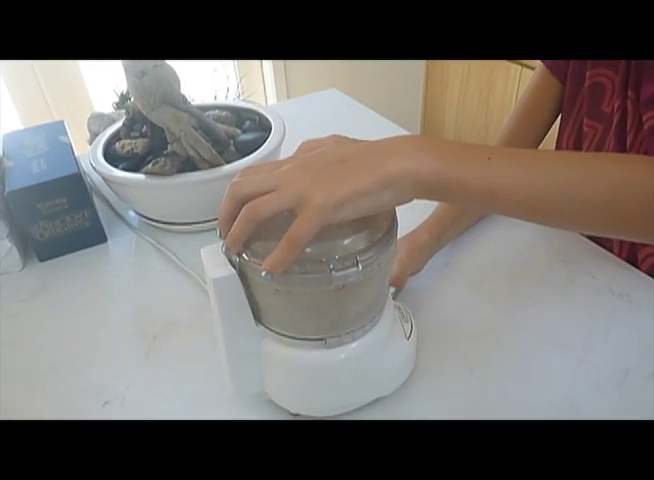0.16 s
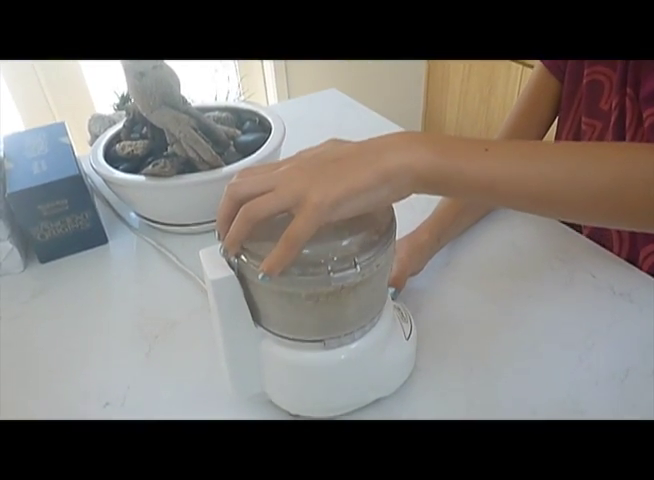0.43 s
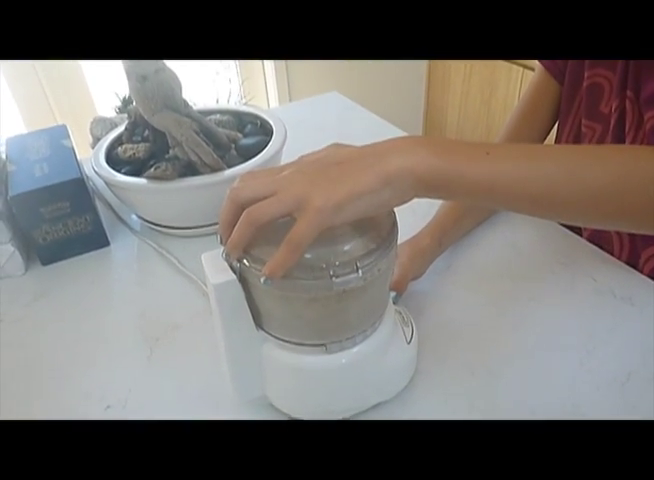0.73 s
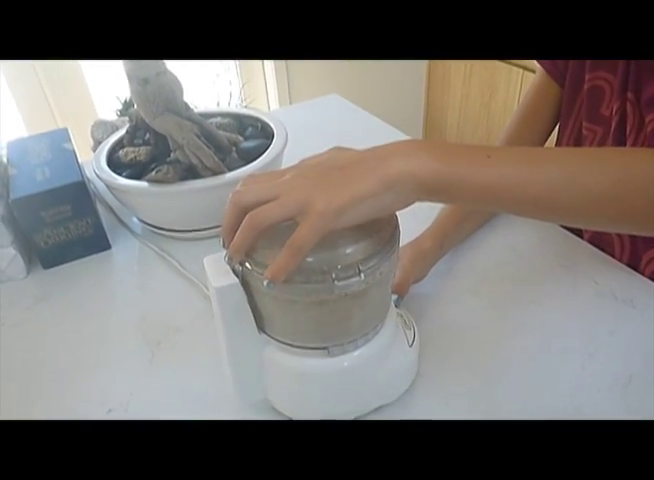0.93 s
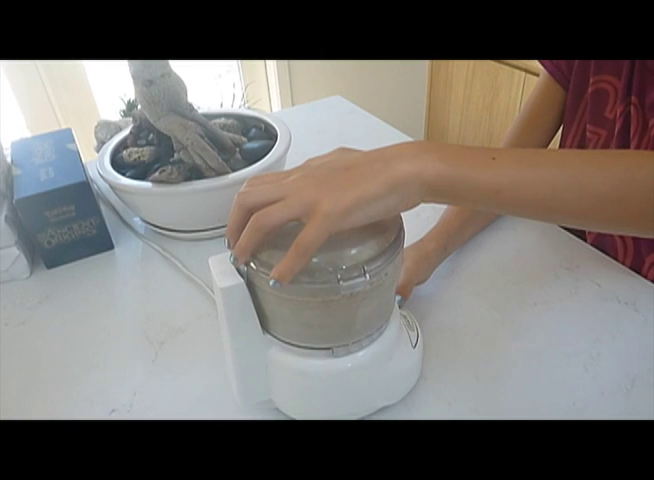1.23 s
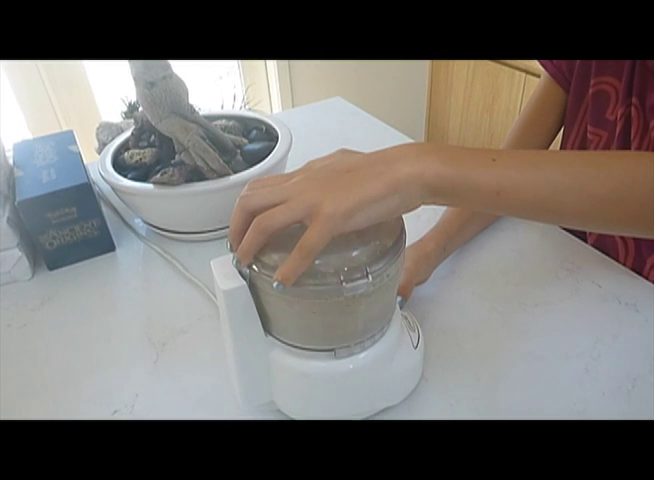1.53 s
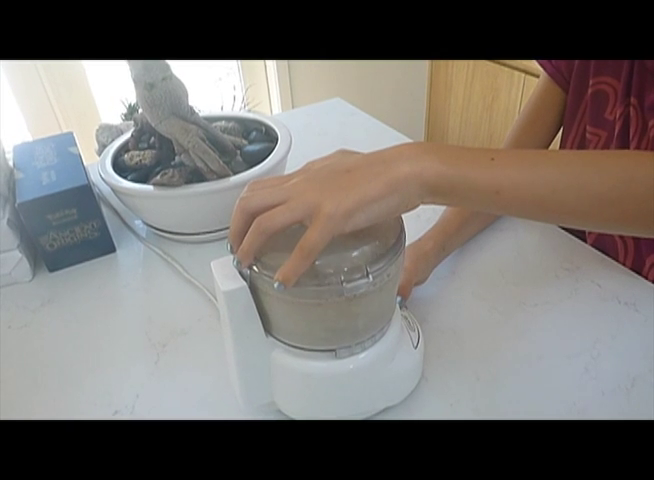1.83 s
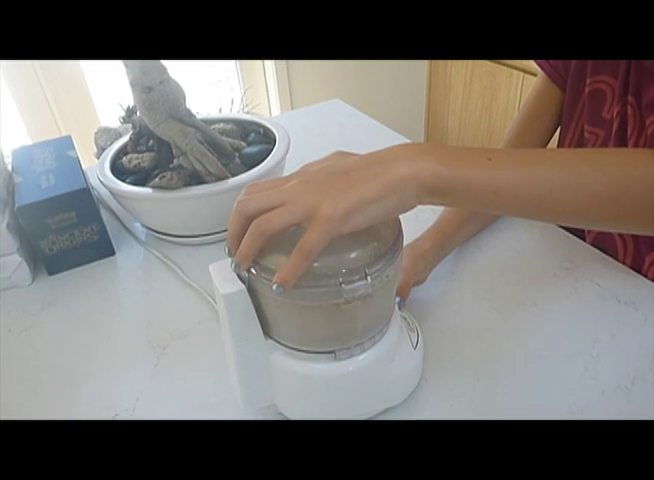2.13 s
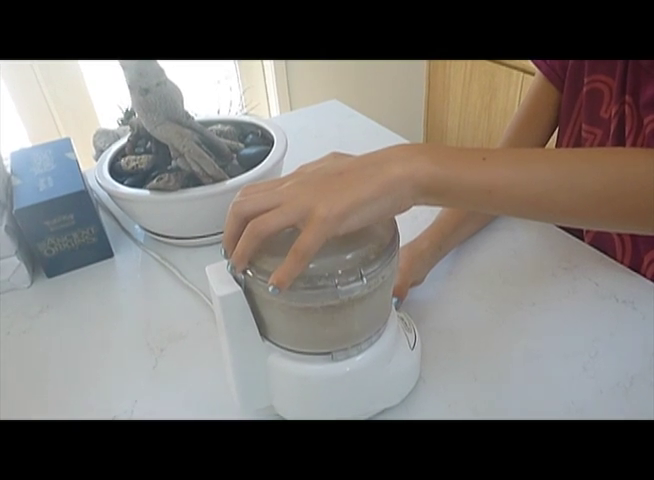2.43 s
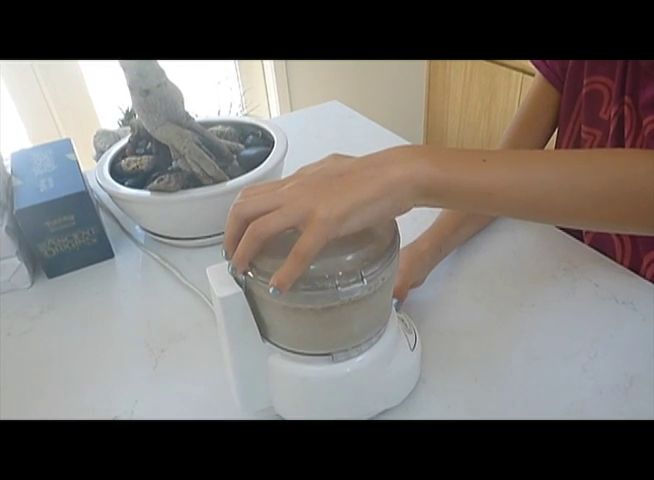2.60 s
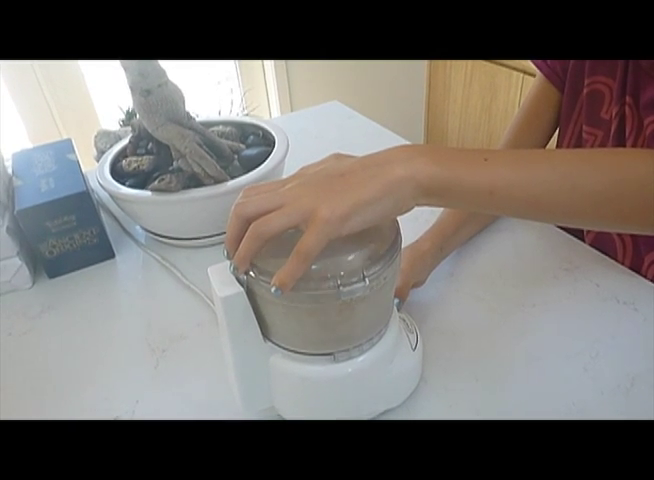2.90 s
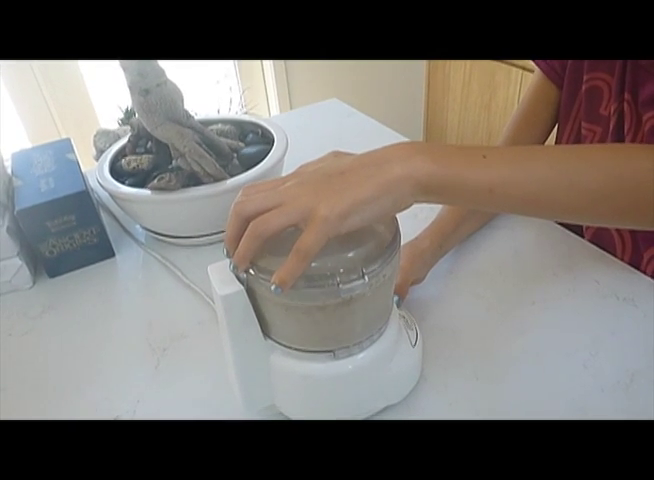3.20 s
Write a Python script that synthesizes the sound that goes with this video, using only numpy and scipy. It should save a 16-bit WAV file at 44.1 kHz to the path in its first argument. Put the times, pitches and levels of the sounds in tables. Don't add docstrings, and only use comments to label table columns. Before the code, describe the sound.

Continuous close-up grinding of nuts in a plastic food processor bowl, crackling busily at first, then sparser and finer, with occasional soft knocks and a low unsteady hum beneath; nearly central sound in a fairly dry kitchen.

```python
import sys
import numpy as np
from scipy import signal
from scipy.fft import rfft, irfft
from scipy.io import wavfile
from scipy.ndimage import uniform_filter1d

SR = 44100
rng = np.random.default_rng(int(sys.argv[2]) if len(sys.argv) > 2 else 0)


def makeup_ratio(level_db):
    decades = np.asarray(level_db, float) / 20
    return 10 ** decades


def generate_wav(signal):
    frames = np.transpose(np.atleast_2d(signal))
    scaled = np.clip(frames, -1, 1) * 32767
    pcm = np.round(scaled).astype(np.int16)
    wavfile.write(sys.argv[1], SR, pcm)


N = 147735

# start in seconds, level in dB (rms), ring in Hz,
# length in ms, treble share in dB.
CRACKS = [(0.0422, -24.2, 2930, 4.2, -11.0), (0.061, -24.3, 3010, 2.5, -11.0),
          (0.0827, -26.7, 2820, 3.0, -13.0), (0.0956, -22.7, 3320, 3.6, -13.0),
          (0.107, -28.1, 3830, 2.4, -9.0), (0.1379, -28.7, 5300, 2.2, -9.0),
          (0.1442, -24.7, 5580, 2.6, -9.0), (0.2069, -27.4, 3210, 2.8, -9.0),
          (0.3493, -23.9, 3850, 2.6, -13.0), (0.3676, -26.6, 2240, 3.1, -13.0),
          (0.4874, -26.3, 3210, 2.9, -10.0), (0.5017, -27.6, 3730, 2.1, -8.0),
          (0.5569, -23.9, 3190, 2.5, -7.0), (0.5956, -19.2, 5380, 3.7, -7.0),
          (0.7041, -26.8, 5990, 2.8, -13.0), (0.7371, -27.8, 3290, 2.7, -8.0),
          (0.82, -26.0, 3980, 3.2, -11.0), (0.9292, -24.9, 5380, 2.7, -10.0),
          (1.011, -23.8, 5470, 2.6, -6.0), (1.1457, -28.9, 5600, 2.6, -7.0),
          (1.1519, -27.7, 4160, 3.1, -12.0), (1.1841, -28.1, 2890, 3.2, -11.0),
          (1.341, -27.1, 3320, 3.0, -7.0), (1.3561, -24.9, 3290, 2.5, -11.0),
          (1.397, -25.5, 5360, 2.8, -12.0), (1.4937, -27.6, 5230, 2.6, -10.0),
          (1.5575, -26.0, 5710, 2.6, -8.0), (1.5884, -26.0, 3340, 2.9, -5.0),
          (1.6209, -26.1, 3420, 3.6, -15.0), (1.6929, -28.4, 5900, 2.5, -10.0),
          (1.7596, -29.1, 3060, 3.5, -5.0), (1.8249, -28.2, 3360, 4.3, -11.0),
          (1.97, -22.5, 3470, 2.8, -10.0), (2.3531, -28.1, 3850, 2.6, -7.0),
          (2.6721, -27.8, 2170, 3.3, -11.0), (2.7316, -26.0, 3040, 4.6, -11.0),
          (2.7737, -22.7, 3490, 3.1, -15.0), (2.9524, -23.0, 3490, 2.7, -13.0),
          (2.9872, -28.7, 5380, 4.2, -6.0), (3.3232, -27.6, 5490, 2.7, -8.0)]
# start in seconds, level in dB (rms), ring in Hz.
CHIPS = [(0.0036, -27.8, 3210), (0.0169, -28.1, 3270), (0.0351, -27.9, 3080), (0.1856, -28.9, 5400),
         (0.2135, -29.1, 5360), (0.2347, -29.8, 5490), (0.2468, -31.4, 3640), (0.3376, -29.4, 5470),
         (0.4538, -29.4, 3510), (0.5232, -30.8, 2860), (0.5428, -28.3, 3400), (0.5725, -29.7, 4740),
         (0.615, -29.0, 3250), (0.6732, -30.9, 3450), (0.6832, -28.4, 3470), (0.7211, -29.0, 3290),
         (0.8001, -30.7, 5640), (0.8338, -31.1, 3730), (0.843, -30.7, 5450), (0.8493, -29.8, 3140),
         (0.8762, -29.5, 4180), (0.897, -30.9, 3230), (0.945, -30.3, 5450), (1.0575, -31.6, 3640),
         (1.0997, -30.9, 3400), (1.1763, -31.1, 2240), (1.2105, -31.1, 3190), (1.2193, -30.3, 3100),
         (1.2466, -31.3, 2990), (1.2596, -30.2, 3470), (1.3111, -30.7, 5490), (1.3806, -28.7, 4200),
         (1.4224, -31.2, 5880), (1.445, -30.1, 3980), (1.4547, -30.9, 3450), (1.4714, -30.5, 2200),
         (1.531, -31.0, 5660), (1.6817, -30.8, 4330), (1.8422, -29.7, 4310), (1.8898, -31.6, 3080),
         (1.942, -28.7, 3360), (2.0105, -31.3, 5380), (2.03, -31.3, 2990), (2.0648, -30.3, 3340),
         (2.0954, -32.0, 3360), (2.1235, -31.4, 5920), (2.1292, -31.4, 3470), (2.2462, -31.6, 3290),
         (2.2859, -30.1, 4290), (2.5798, -29.0, 4160), (2.7658, -30.0, 3400), (2.8076, -29.8, 3750),
         (2.8156, -30.2, 3790), (2.8399, -29.5, 4010), (2.9136, -29.0, 4160), (2.9347, -30.7, 2950),
         (2.9794, -30.1, 3360), (3.12, -31.1, 3140), (3.1799, -30.6, 3550), (3.308, -29.6, 3790)]
# start in seconds, level in dB (rms), ring in Hz.
FAINT_CHIPS = [(0.3184, -32.2, 5380), (0.4076, -32.3, 5430), (0.5144, -32.0, 5530), (0.5323, -31.9, 5230),
               (0.5864, -31.6, 4310), (0.6567, -31.6, 2200), (0.8277, -31.2, 5250), (0.9078, -32.3, 5340),
               (1.5222, -31.2, 5940), (1.538, -31.9, 3080), (1.5728, -32.0, 2170), (1.8565, -31.9, 5300),
               (1.9763, -31.5, 3400), (2.2314, -32.1, 2860), (2.5233, -31.8, 2220), (2.5427, -31.7, 4440),
               (2.6913, -31.4, 3120), (2.702, -31.5, 3120), (2.7422, -31.4, 3170), (2.7598, -31.2, 3380),
               (2.8004, -30.9, 5340), (2.8577, -31.8, 3380), (2.9002, -31.4, 2950), (3.0852, -31.6, 5430)]


def rms_one(x):
    return x / np.sqrt(np.mean(x ** 2) + 1e-20)


def in_time(rows):
    s, *columns = np.transpose(rows)
    return [np.interp(np.arange(N) / SR, s, c) for c in columns]


def drift(rate_hz):
    r = np.exp(-2 * np.pi * rate_hz / SR)
    slow = signal.lfilter([1], [1, -2 * r, r * r], rng.standard_normal(N + SR))
    return rms_one(slow[SR:])


def butter(x, order, hz, kind):
    return signal.sosfilt(signal.butter(order, hz, kind, fs=SR, output="sos"), x)


def resonance(x, hz, width_hz):
    r = np.exp(-np.pi * width_hz / SR)
    poles = [1, -2 * r * np.cos(2 * np.pi * hz / SR), r * r]
    return signal.lfilter([(1 - r * r) / 2, 0, (r * r - 1) / 2], poles, x)


def octave(x, hz):
    return butter(x, 1, [hz / np.sqrt(2), min(hz * np.sqrt(2), .48 * SR)], "band")


def bowl(x):
    # frequency in Hz, width in Hz, gain in dB.
    modes = [(172, 122, 12.5), (486, 490, -6.5), (791, 340, 12.5), (1533, 150, 3.5), (1934, 73, -16),
             (2235, 357, 8.5), (2394, 49, -25), (3153, 1590, 14), (4200, 890, 4), (5615, 1260, 9.5),
             (8120, 1600, 3.5), (9170, 1900, -0.5), (11600, 610, -2), (14680, 3000, 7.5)]
    sos = [signal.butter(2, 114, "high", fs=SR, output="sos")[0]]
    for hz, width_hz, db in modes:
        a, g, c = np.tan(np.pi * width_hz / SR), makeup_ratio(db / 2), -2 * np.cos(2 * np.pi * hz / SR)
        peak = np.array([1 + a * g, c, 1 - a * g, 1 + a / g, c, 1 - a / g])
        sos.append(peak / (1 + a / g))
    impulse = np.eye(1, SR)[0]
    energy = np.sum(signal.sosfilt(sos, impulse) ** 2)
    return signal.sosfilt(sos, x) / np.sqrt(energy)


def kitchen(x):
    t60_s, wall_cut_hz = 0.22, 2140
    out, dull = np.zeros(N), np.exp(-2 * np.pi * wall_cut_hz / SR)
    lags = (rng.uniform(0.0073, .03, 10) * SR).astype(int)
    for k, lag in enumerate(lags):
        loop, gain, state = x.copy(), makeup_ratio(-60 * lag / SR / t60_s), [0.]
        for i in range(lag, N, lag):
            back, state = signal.lfilter([gain * (1 - dull)], [1, -dull], loop[i - lag:i], zi=state)
            loop[i:i + lag] += back[:N - i]
        out += (loop - x) * (-1) ** k
    return out


def motor():
    # time in seconds, level in dB.
    unbalance = [
        (0.0, -52),
        (0.16, -51),
        (0.33, -67),
        (0.53, -52),
        (0.95, -50),
        (1.12, -64),
        (3.35, -66),
    ]
    # time in seconds, frequency in Hz, level in dB.
    housing = [
        (0.0, 272.8, -47),
        (0.89, 287, -46),
        (1.06, 296.8, -48.5),
        (1.15, 282, -47.5),
        (1.81, 288.5, -48),
        (2.17, 288, -45.5),
        (2.29, 271.7, -56.5),
        (2.41, 287.5, -48.5),
        (3.35, 289.1, -43.5),
    ]
    shaft_hz, shaft_wobble_hz, shaft_db = 145.8, 3.04, 1.5
    hum_wobble_hz, throb_db, rough_db, rough_width_hz = 5, 3.8, -3.5, 55
    judder_db, rumble_db, rumble_hz = -59.5, -73.5, 73.5

    unbalance_db, = in_time(unbalance)
    hum_hz, hum_db = in_time(housing)
    shaft_phase = 2 * np.pi * np.cumsum(shaft_hz + shaft_wobble_hz * drift(7.8)) / SR
    shaft = makeup_ratio(unbalance_db + shaft_db) * np.sin(shaft_phase)

    throb = makeup_ratio(throb_db * drift(18))
    line = throb * np.sin(2 * np.pi * np.cumsum(hum_hz + hum_wobble_hz * drift(12.55)) / SR)
    skirt = rng.standard_normal(N)
    for _ in range(2):
        skirt = resonance(skirt, hum_hz.mean(), rough_width_hz)
    hum = makeup_ratio(hum_db) * rms_one(rms_one(line) + makeup_ratio(rough_db) * rms_one(skirt))

    rumble = butter(rng.standard_normal(N), 2, [rumble_hz / 2, rumble_hz * 2], "band")
    judder = resonance(rng.standard_normal(N), shaft_hz, rough_width_hz / 2)
    return np.sqrt(2) * shaft + makeup_ratio(judder_db) * rms_one(judder) + hum + makeup_ratio(rumble_db) * rms_one(rumble)


def knocks():
    # start in seconds, level in dB (rms).
    throws = [(0.027, -39.3), (0.061, -42.8), (0.446, -44.1), (0.488, -43.2), (0.524, -41.5),
              (0.587, -42.9), (0.698, -42.6), (0.721, -41.6), (0.875, -41.1), (1.154, -41.6),
              (1.263, -43.8), (1.338, -41.4), (1.36, -43.8), (1.467, -43.0), (1.491, -42.3), (1.716, -40.8),
              (1.772, -41.4), (1.969, -38.5), (2.578, -42.2), (2.668, -40.1), (2.734, -42.2),
              (2.771, -43.7), (3.292, -42.7)]
    length_ms, cut_hz = 6, 1500
    out, ms_since = np.zeros(N + SR), 1000 * np.arange(SR // 20) / SR
    envelope = ms_since * np.exp(-2 * ms_since / length_ms)
    bursts = rng.choice([-1., 1.], (len(throws), len(ms_since))) * envelope
    bursts = butter(bowl(bursts), 2, [cut_hz / 3, cut_hz], "band")
    for (s, db), burst in zip(throws, bursts):
        i = int(s * SR)
        loudest = np.sqrt(uniform_filter1d(burst ** 2, size=500).max())
        out[i:i + len(burst)] += makeup_ratio(db) * burst / loudest
    return out[:N]


def crumbs():
    # time in seconds, level in dB.
    whirl = [(0, -28), (.1, -32.5), (.14, -35), (.21, -31.5), (.3, -35), (.5, -32), (.74, -33),
             (.98, -33.5), (1.2, -33.5), (1.4, -33), (1.7, -34.5), (1.93, -32.5), (2.06, -34), (2.4, -33.5),
             (2.75, -32), (2.97, -31.5), (3.04, -34), (3.35, -32)]
    # frequency in Hz, width in Hz, level in dB.
    wall_rings = [(681, 47, 9), (818, 45, 7), (1003, 41, 11), (1550, 280, -1), (2230, 470, 6.5),
                  (2910, 73, 5.5), (3630, 117, -14), (4230, 530, 2.5), (5250, 180, 6.5), (6000, 290, 4.5),
                  (7850, 1900, -3), (15200, 1350, 2.5)]
    powder_db, flicker_db, patch_db = -1.5, 1.5, 0.5
    ticks_per_s, spread_db, tick_ms, tick_db, clump_db = 900, 3, 0.99, -4, .8
    ringing_db = 6.5 + 15.5
    follow = 0.4
    finer_db_per_s = -1.5
    lull_db, lull_ms = -8, 5

    t = np.arange(N) / SR
    level_db, = in_time(whirl)
    together, powder, white = drift(23), 0, rng.standard_normal(N)

    born = rng.random(N) < ticks_per_s * makeup_ratio(clump_db * drift(18)) / SR
    sizes = born * makeup_ratio(spread_db * np.minimum(rng.exponential(1, N), 1.6))
    dealt = rng.integers(0, len(wall_rings), N)
    fall = np.exp(-1000 / (tick_ms * SR))
    swell = [1, -2 * fall, fall ** 2]
    broad = white * signal.lfilter([1], swell, sizes)
    ringing = 0
    for k, (hz, width_hz, db) in enumerate(wall_rings):
        strikes = white * signal.lfilter([1], swell, sizes * (dealt == k))
        ringing = ringing + makeup_ratio(db) * resonance(strikes, hz, width_hz)
    ticks = rms_one(broad + makeup_ratio(ringing_db) * ringing)

    for hz in 72 * 2. ** np.arange(9):
        flicker = makeup_ratio(flicker_db * together + patch_db * drift(28))
        powder = powder + octave(rng.standard_normal(N), hz) * flicker

    lull = 0
    for s, *_ in list(CRACKS) + list(CHIPS) + list(FAINT_CHIPS):
        lull = lull + np.exp(-((s - t) * 1000 / lull_ms - .5) ** 2)
    coarse_db = tick_db + follow * (level_db - level_db.mean()) + finer_db_per_s * t + lull_db * lull
    return bowl(makeup_ratio(level_db) * (makeup_ratio(powder_db) * rms_one(powder) + makeup_ratio(coarse_db) * ticks))


def cracks():
    crack_db, ring_db, ring_width_hz, snap_db, snap_ms = .6, -2, 600, -4, .5
    small_ms, rise_ms, fall_ms, small_treble_db, treble_hz = 2.8, .3, 1.6, -9, 7500
    small = [(*row, small_ms, small_treble_db) for row in list(CHIPS) + list(FAINT_CHIPS)]
    pieces = np.array(list(CRACKS) + small)
    out, ms_since = np.zeros(N + SR), 1000 * np.arange(SR // 40) / SR

    white = rng.choice([-1., 1.], (len(pieces), len(ms_since))) * np.minimum(ms_since / rise_ms, 1)
    snap = makeup_ratio(snap_db) * np.exp(-ms_since / snap_ms)
    splinter = np.exp(-np.maximum(ms_since - pieces[:, 3:4] + rise_ms, 0) / fall_ms)
    bursts = bowl(white * (snap + splinter))
    low, high = butter(bursts, 4, treble_hz, "low"), butter(bursts, 4, treble_hz, "high")

    for (s, db, hz, _, treble_db), body, treble in zip(pieces, low, high):
        body = rms_one(body) + makeup_ratio(ring_db) * rms_one(resonance(body, hz, ring_width_hz))
        treble = treble * np.exp(-ms_since / small_ms)
        burst = rms_one(body) + makeup_ratio(treble_db) * rms_one(treble)
        i = int(s * SR)
        loudest = np.sqrt(uniform_filter1d(burst ** 2, size=110).max())
        out[i:i + len(burst)] += makeup_ratio(db + crack_db) * burst / loudest
    return out[:N]


def scene():
    grind = crumbs() + cracks() + knocks()
    mono = grind + makeup_ratio(-17.5) * kitchen(grind) + motor()
    return np.tile(mono, (2, 1))


def band_limit(x):
    return signal.sosfilt(signal.butter(12, 16910, fs=SR, output="sos"), x)


def record(dry):
    # centre in seconds, half length in seconds, side below mid in dB.
    partings = [(0.116, 0.024, -10.5), (.477, 0.027, -13), (1.343, 0.041, -10.5), (1.502, 0.024, -12),
                (1.735, 0.021, -12), (1.89, 0.038, -12.5), (1.992, 0.017, -16), (2.353, 0.026, -12),
                (2.438, 0.02, -11), (2.91, 0.032, -13.5), (2.951, 0.023, -10), (3.148, 0.036, -15),
                (3.35, 0.021, -15)]
    bands, parted_share = 90, .65
    t, colour, side = np.arange(N) / SR, np.abs(rfft(dry[0])), 0
    band = (bands * np.sqrt(np.linspace(0, 1, len(colour)))).astype(int)
    scrambled = colour * np.exp(2j * np.pi * rng.random(len(colour)))
    parted = rng.random((len(partings), bands + 1)) < parted_share
    for (s, half, db), open_bands in zip(partings, parted):
        window = np.cos(np.pi / 2 * np.clip((t - s) / half, -1, 1)) ** 2
        side = side + makeup_ratio(db + 1.0) * window * irfft(scrambled * open_bands[band], N)
    top_cut = signal.ellip(10, .5, 45, 15900, fs=SR, output="sos")
    return band_limit(signal.sosfilt(top_cut, dry + side * [[1], [-1]]))


dry = scene()
out = record(dry)
generate_wav(out)
```